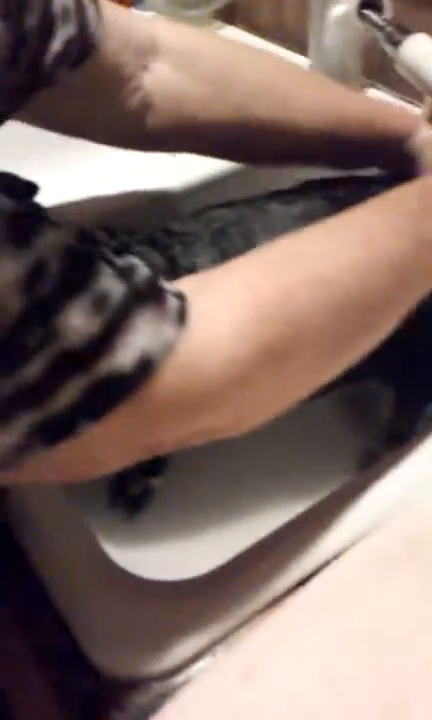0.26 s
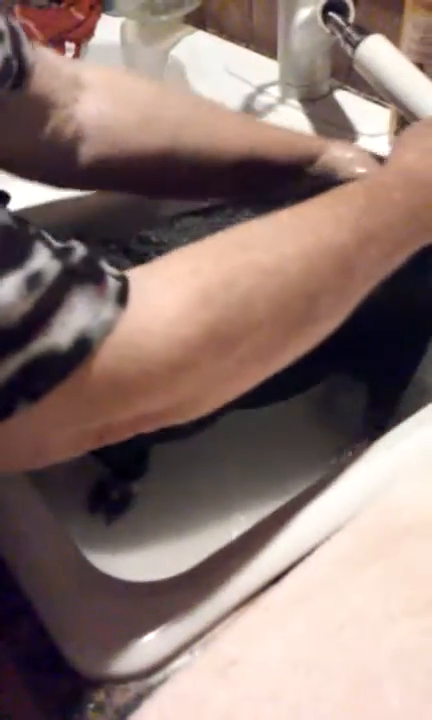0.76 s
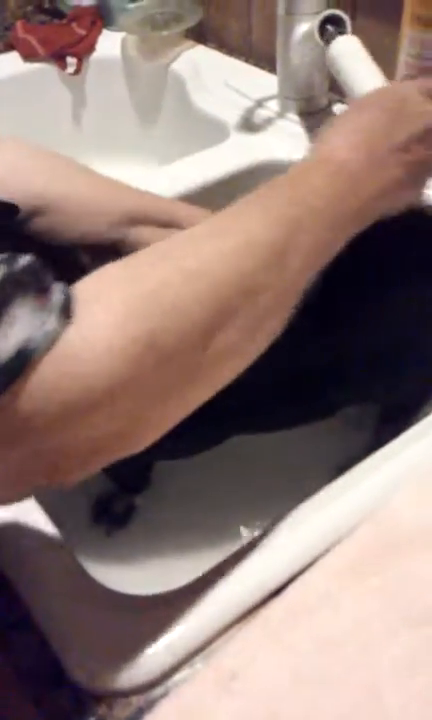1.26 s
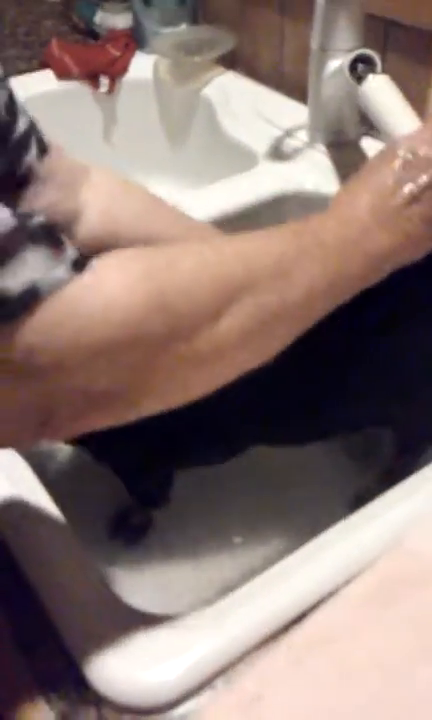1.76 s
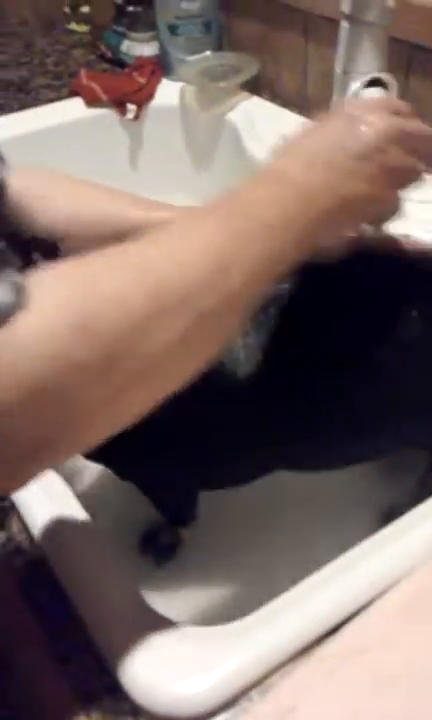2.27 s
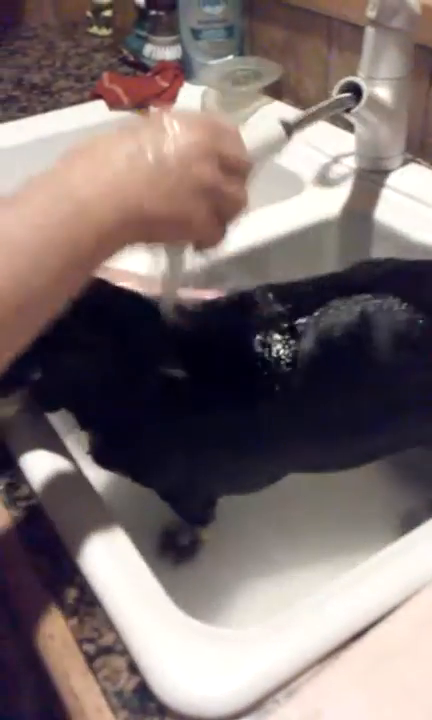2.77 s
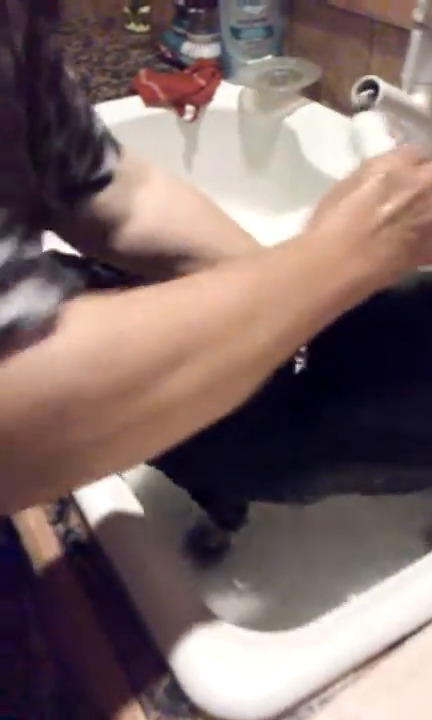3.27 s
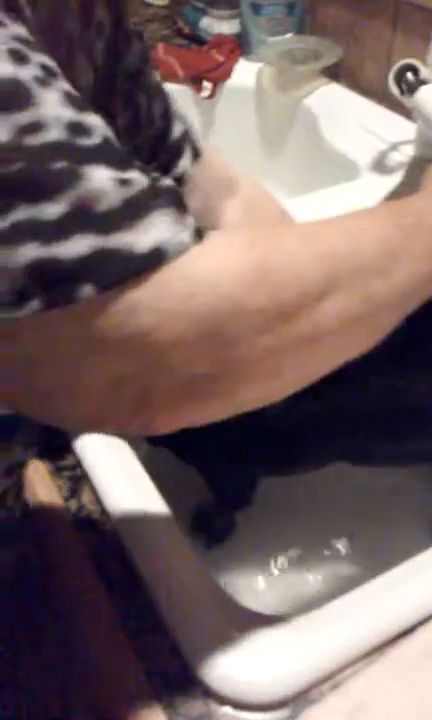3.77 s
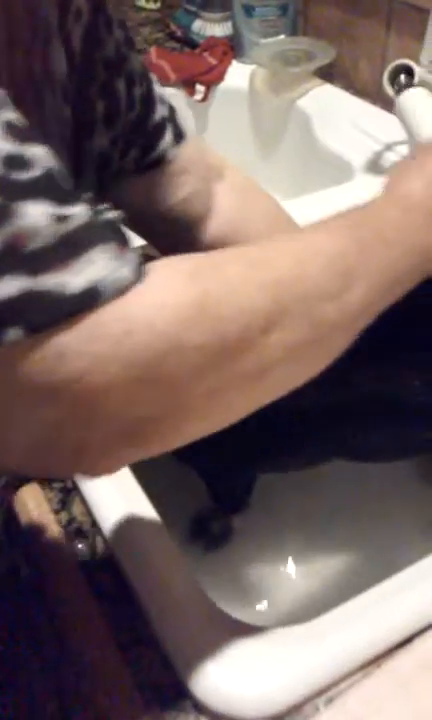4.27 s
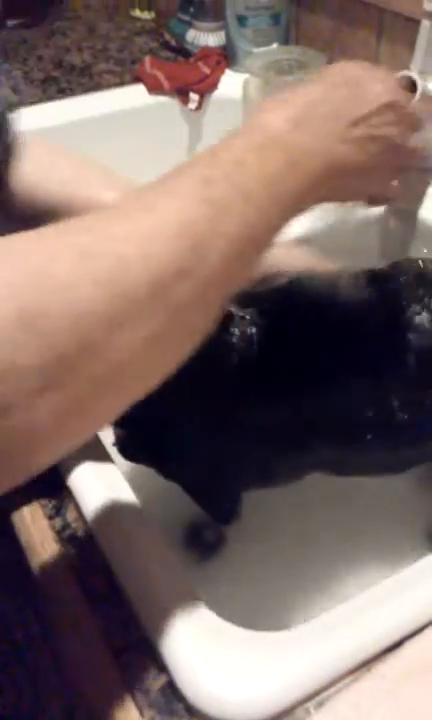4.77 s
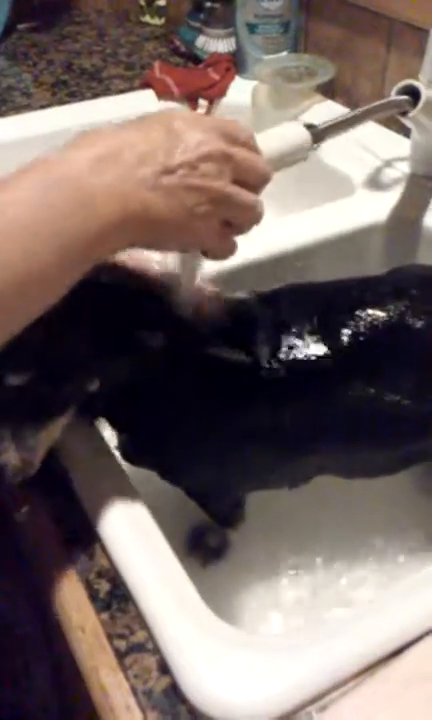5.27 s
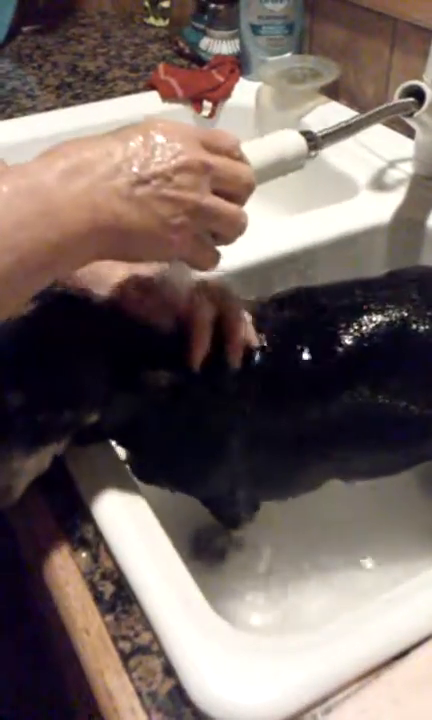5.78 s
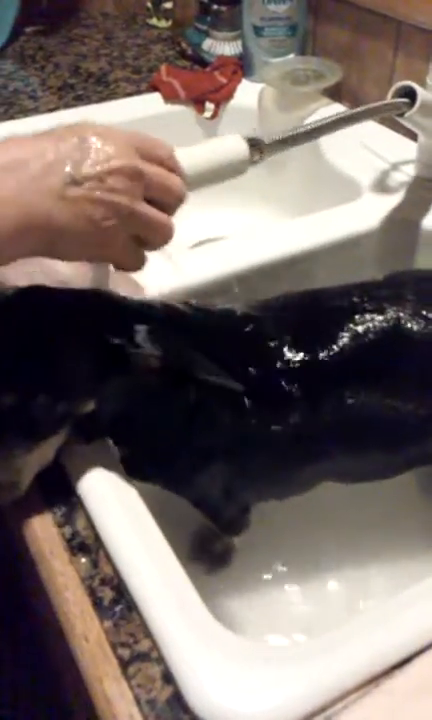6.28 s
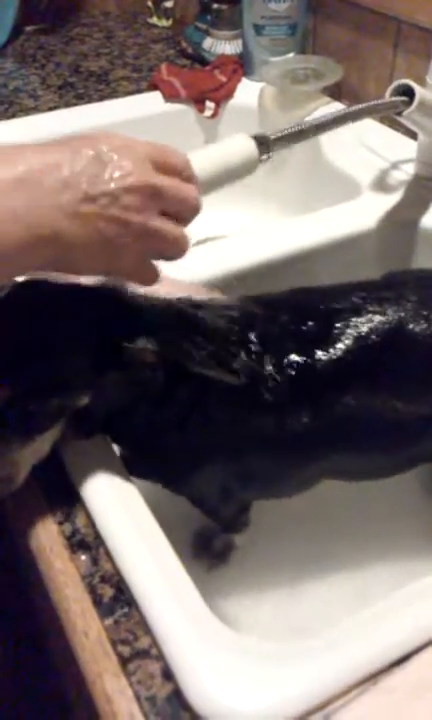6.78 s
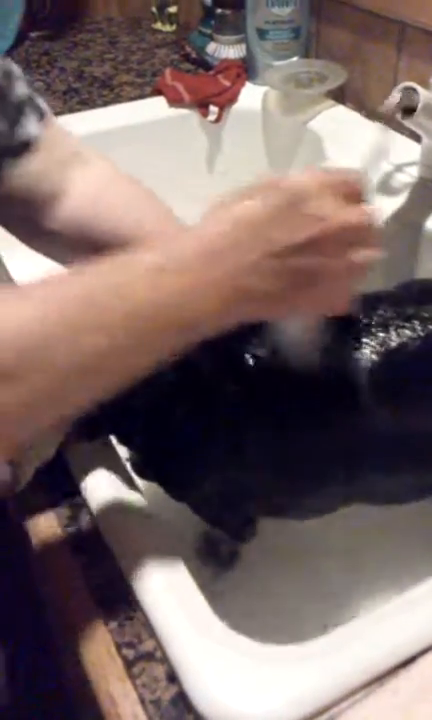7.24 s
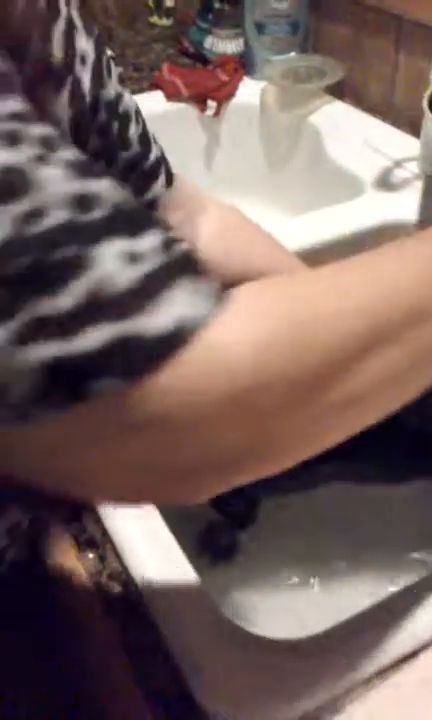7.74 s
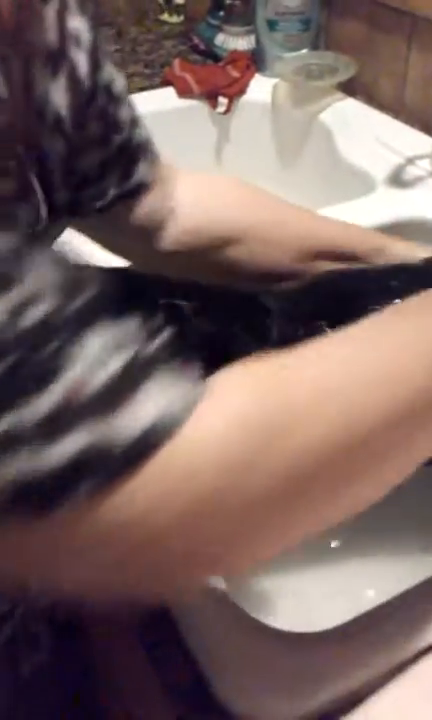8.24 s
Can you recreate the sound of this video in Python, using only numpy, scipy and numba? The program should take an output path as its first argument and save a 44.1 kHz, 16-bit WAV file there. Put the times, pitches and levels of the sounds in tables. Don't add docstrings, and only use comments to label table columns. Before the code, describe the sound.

A close phone microphone picks up a sink sprayer rinsing a small wet dog. Bright hiss and mid-pitched run-off patter come in ragged bursts, with plops, high pings, sharp droplet cracks and occasional low glugs. Noise suppression keeps chopping the water to near silence, leaving tiny ticks before it snaps open again. A faint fridge hum rides under the louder spurts.

```python
import sys
import numpy as np
from scipy import signal
from scipy.io import wavfile
from scipy.ndimage import uniform_filter1d
from numba import njit

SR = 44100
rng = np.random.default_rng(int(sys.argv[2]) if len(sys.argv) > 2 else 0)


def voltage_ratio(decibels):
    exponent = np.asarray(decibels, float) / 20
    return 10 ** exponent


def digitize_waveform(pressure):
    field = np.atleast_2d(pressure).T
    bounded = np.clip(field, -1, 1)
    quanta = np.round(bounded * 32767).astype(np.int16)
    wavfile.write(sys.argv[1], SR, quanta)


N = 375291
TOP_HZ = 15780

# (frequency [Hz], density [dB per Hz])
JET_SPECTRUM = [(1760, -30), (3000, -11.5), (3620, -0.5), (3940, -8.5), (4470, 3.5), (5000, -7), (6220, -1),
                (11500, -1.5), (16000, -4)]
# (time [s], treble slope of the hiss [dB per octave])
FACING = [(0, -4), (.5, -4), (.9, -2.5), (1.6, 0), (2.1, -3), (2.6, 2), (3.101, -1.5), (3.601, 0),
          (4.2, -2), (4.6, 2), (5.101, 4.5), (5.402, 4), (5.799, 0), (6.351, -2), (6.8, -0.5), (7.2, 0.5),
          (7.601, -1.5), (8.5, -1)]


def jet(hiss_db, openness):
    slope = openness * np.interp(np.arange(N) / SR, *np.transpose(FACING))
    fizz = swarm(rate=1400, centre_hz=5000, octaves=0.7, cycles=16.0, spread_db=3.6, glide=0.03)
    crackle = swarm(rate=160, centre_hz=6000, octaves=0.5, cycles=6.0, spread_db=2.8, glide=0)
    hiss = patchy(JET_SPECTRUM, openness, per_octave=6, snap_db=2.0, fall_s=0.07, flicker_db=3.5, tilt_db=slope)
    return voltage_ratio(hiss_db - 0.1) * (hiss + openness * voltage_ratio(-6.0) * (fizz + crackle))


# (frequency [Hz], density [dB per Hz])
PATTER_SPECTRUM = [(150, -32), (250, -15), (599, -18), (690, -17.5), (786, -16.5), (916, -24.5),
                   (1080, -4.5), (1340, -13.5), (2090, -1), (2650, -11.5), (4200, -27), (5460, -36),
                   (9240, -120)]


def run_off(patter_db, openness):
    small_bubbles = swarm(rate=300, centre_hz=2050, octaves=0.3, cycles=13.0, spread_db=4.3, glide=0.03)
    patter = patchy(PATTER_SPECTRUM, openness, per_octave=7, snap_db=3.4, fall_s=0.045, flicker_db=3.0)
    return voltage_ratio(patter_db - 14.5) * (patter + openness * small_bubbles)


# (frequency [Hz], width [Hz])
BASIN_DIPS = [(800, 89), (1400, 110), (2800, 52), (4000, 330), (5800, 370)]


def basin(water):
    for hz, width in BASIN_DIPS:
        water = water - 0.62 * svf(water, float(hz), float(width))
    return water


# (crest time [s], peak level
# [dB], frequency [Hz], swell time [ms])
POOL_DROPS = [(0.031, -40, 1850, 3.9), (0.169, -32.5, 1740, 5.3), (0.766, -30, 1730, 2), (0.816, -26, 1735, 3),
              (0.827, -30.5, 1800, 3), (0.911, -32, 1780, 1.07), (0.915, -31.5, 1563, 3.5),
              (1.102, -40.5, 1670, 1.7), (1.984, -37, 1715, 4.5), (2.367, -25, 1867, 2), (2.373, -30.5, 1880, 2),
              (2.905, -30.0, 1950, 3), (3.102, -36.0, 1738, 7), (3.183, -28.5, 1960, 3.4),
              (3.51, -38.5, 1780, 5.6), (3.587, -31, 1930, 0.9), (3.68, -27.5, 1484, 6.5),
              (3.698, -22.5, 1680, 4), (3.752, -25.5, 1790, 3), (3.793, -27, 1850, 2), (3.798, -30.5, 1680, 2.6),
              (3.826, -30, 1940, 2.9), (3.869, -25.5, 1383, 4.1), (3.879, -33, 1920, 3.1),
              (4.296, -22.5, 1685, 0.9), (4.301, -31, 1890, 2), (4.565, -41, 1640, 7.9), (5.132, -40, 1950, 6.5),
              (5.154, -40.5, 1970, 6.5), (5.814, -28.5, 1780, 5.6), (5.872, -20.5, 1780, 4.9),
              (5.884, -29, 1970, 1.3), (6.335, -34, 2016, 6.5), (7.454, -27, 1880, 1.17), (8.03, -38, 1710, 4),
              (8.081, -31.5, 1745, 6.1), (8.462, -29.5, 1560, 3.2),
              (0.068, -34, 1970, 2.8), (0.151, -29.5, 2300, 2), (1.887, -24, 2400, 2.8),
          (1.903, -30, 2100, 2.5), (1.922, -29.5, 2110, 3), (2.11, -28.0, 2240, 2), (2.296, -37, 2100, 2),
          (2.618, -46, 2170, 6.2), (2.916, -27, 2210, 2.4), (2.927, -27.5, 2200, 3.3),
          (3.002, -31.0, 2400, 1.1), (3.204, -30, 2100, 3.7), (4.262, -30, 2060, 2),
          (4.279, -24.5, 1960, 0.62), (4.296, -29, 2240, 1.3), (4.666, -33.5, 1950, 6.5),
          (4.682, -26.5, 2240, 2), (4.766, -27.5, 2230, 1.7), (4.929, -31.5, 2160, 2.8),
          (4.959, -33.5, 2260, 2.8), (5.012, -30.5, 2350, 2), (5.177, -36.0, 2130, 4.2),
          (5.283, -32, 2170, 2), (5.828, -27.5, 1970, 3.8), (5.9, -32, 2050, 6.5), (6.317, -33, 2020, 3.1),
          (6.326, -25.5, 2120, 1.3), (6.344, -27, 2170, 2.16), (6.406, -31.5, 2000, 2),
          (6.507, -30.0, 2610, 1.7), (7.366, -29, 2160, 0.95), (7.376, -31, 2340, 5.1),
          (7.396, -35.5, 2405, 7.1), (7.417, -32.0, 2340, 3.1), (7.6, -38.5, 2070, 5.3),
          (8.179, -34, 2510, 4.5), (8.192, -30, 2480, 3.2), (8.381, -32, 2000, 4.1), (8.397, -31, 2050, 2),
          (8.412, -23.5, 2030, 6.5)]


def pool_drops(gate_db):
    return drops(POOL_DROPS, gate_db, ring_db=0.96, leak_db=-11.5, width=0.57, leak_t60=0.16, glide=0.023)


# (crest time [s], peak level [dB], frequency [Hz], swell time [ms])
PINGS = [(0.01, -32, 5400, 0.8), (0.067, -38, 4650, 1.7), (0.125, -38, 3900, 3), (0.21, -34, 5080, 2),
         (0.212, -26.5, 3570, 2.8), (0.368, -22.5, 4840, 1.9), (0.371, -29.0, 3960, 1.03),
         (0.452, -31, 5020, 2), (0.499, -30, 3700, 0.88), (0.603, -22.5, 4780, 0.8),
         (0.604, -35.5, 2840, 4.8), (0.818, -26.0, 3440, 1.8), (0.818, -23, 4850, 1.28),
         (1.886, -34.5, 4625, 1.8), (1.891, -24, 2900, 1), (2.08, -38.5, 4630, 2.3),
         (2.899, -25.5, 5100, 0.8), (2.902, -31.0, 4570, 1.3), (2.926, -34, 4620, 3.6),
         (3.116, -25, 4650, 4.1), (3.134, -28, 3490, 0.53), (3.231, -29.5, 4870, 1.3),
         (4.669, -24, 4960, 0.8), (5.744, -28, 3950, 1.6), (5.757, -25.5, 4330, 1.9),
         (5.934, -38, 4250, 2.2), (6.42, -37.0, 5030, 4.2), (6.488, -30, 4280, 1.3),
         (6.505, -40.5, 3100, 8.1), (6.519, -33.5, 3080, 2.9), (6.832, -36.5, 4320, 1.4),
         (8.028, -33, 5750, 1.46), (8.138, -39, 3130, 2), (8.143, -25, 4930, 0.8),
         (8.178, -30.5, 3270, 1.8), (8.202, -27.5, 4560, 0.8), (8.202, -23.5, 3200, 1.14),
         (8.207, -32, 3230, 1.3), (8.303, -25.5, 4600, 2)]


def wall_drops(gate_db):
    return drops(PINGS, gate_db, ring_db=0.74, leak_db=-10.5, width=0.28, leak_t60=0.11, glide=0.015)


# (crest time [s], peak level [dB], frequency [Hz], swell time [ms])
GLUGS = [(.068, -36.5, 1110, 3), (.699, -29, 1232, 6), (.82, -24.5, 752, 8), (.832, -27, 1115, 9),
         (.968, -41, 241, 9), (2.089, -34, 1047, 7.5), (2.154, -39, 1070, 3), (2.35, -24, 234, 4.5),
         (2.373, -37.5, 243, 9), (3.077, -28, 846, 12), (3.099, -30, 874, 4.5), (3.232, -22, 749, 4.5),
         (3.257, -30.5, 713, 6.5), (3.489, -36, 1034, 4.5), (3.706, -29, 1030, 11), (3.713, -22.5, 357, 9),
         (3.751, -29.5, 510, 6.5), (4.278, -38, 494, 6.5), (4.279, -36, 718, 8), (4.667, -34.5, 476, 3),
         (4.673, -20.5, 399, 3), (5.058, -33.5, 1160, 6.5), (5.266, -39, 1425, 5.05),
         (5.777, -34, 1146, 6.5), (5.814, -22.5, 747, 3), (5.823, -32.5, 830, 6.5),
         (5.841, -35.5, 760, 4.5), (5.954, -37.5, 216, 17), (5.99, -39.5, 190, 9), (6.44, -37, 1530, 5.05),
         (6.527, -30, 526, 9), (6.56, -33, 538, 12), (6.592, -37.5, 535, 9), (6.67, -47, 824, 9),
         (8.1, -27, 204, 6), (8.145, -30.5, 820, 4.5), (8.154, -29, 1110, 3), (8.179, -31, 1190, 4.5),
         (8.446, -32, 1180, 3)]


def gulps(gate_db):
    return drops(GLUGS, gate_db, ring_db=0.37, leak_db=-11, width=0.28, leak_t60=0.26, glide=0.017)


# (time [s], peak level [dB],
# frequency [Hz], 8 dB fall time of the # ring [ms])
SINGING_BANDS = [(.322, -39, 740, 3.5), (1.609, -29.5, 1800, 2), (1.612, -38, 2300, 13), (2.633, -41, 437, 25),
                 (5.09, -41.5, 1976, 133), (5.123, -46, 448, 35), (5.235, -51, 423, 13),
                 (7.275, -41.5, 2236, 68), (8.34, -40.5, 2050, 60), (4.886, -44.5, 3190, 147),
                 (6.268, -40, 2000, 137), (7.345, -40, 2090, 42), (3.462, -46.5, 1056, 72.5),
                 (7.8, -51.5, 702, 57), (8.34, -49.5, 639, 113), (.006, -46, 4700, 54), (.006, -44, 3020, 23),
                 (.2, -37, 1185, 12), (.33, -41, 2120, 36), (.38, -44, 4820, 95), (.77, -50, 1070, 33),
                 (.85, -41, 1466, 63), (2.61, -42, 2344, 61), (3.24, -37, 1078, 47), (3.565, -44.5, 2730, 62),
                 (3.85, -45.5, 3050, 97), (4.252, -29, 2130, 2.5), (4.345, -47, 4470, 60),
                 (5.727, -38, 4450, 15), (5.735, -40.5, 1640, 58), (6.265, -43, 4580, 80.5),
                 (6.29, -43, 1454, 60), (6.39, -50, 4900, 87), (6.6, -46.5, 3400, 12), (7.41, -50, 1320, 39),
                 (7.42, -46, 4270, 46), (7.56, -47.5, 2040, 74), (7.82, -51, 1344, 31), (7.83, -46.5, 2020, 50),
                 (7.915, -48.5, 1984, 50), (8.06, -44.5, 5060, 68), (8.17, -38, 1680, 42)]


def singing_bands(gate_db):
    return bubbles(SINGING_BANDS, gate_db, ring_db=-6.0, leak_db=-7, width=0.12, leak_t60=0.027, glide=0, rise_s=0.006)


# (time [s], peak level [dB], frequency [Hz], 8 dB fall time of the ring [ms])
BLOOPS = [(.121, -49.5, 713, 42), (.284, -54, 740, 28), (1.291, -46, 687, 7), (2.39, -43.5, 990, 13),
          (2.717, -43, 444, 32), (4.67, -37.5, 1102, 10.5), (4.976, -45, 925, 14),
          (5.117, -45.5, 1131, 33.5), (6.838, -50, 1143, 40), (7.925, -53, 709, 71), (7.935, -45, 158, 42),
          (8.356, -44, 162, 72)]


def gurgles(gate_db):
    return bubbles(BLOOPS, gate_db, ring_db=4.5, leak_db=-12.0, width=0.23, leak_t60=0.035,
                   glide=0.0077, rise_s=0.003)


# (time [s], peak level [dB])
CRACKS = [(0.0274, -36), (0.21, -35.5), (0.367, -34), (0.432, -39), (0.601, -48), (0.6738, -40),
          (3.565, -38), (3.93, -40.5), (4.295, -44), (0.8151, -25.5), (1.8771, -62), (1.886, -34.5),
          (2.8783, -34.5), (2.896, -30.5), (3.221, -39), (4.6666, -37.5), (5.575, -63), (5.591, -51),
          (5.726, -42.5), (5.7528, -37), (6.265, -57.5), (6.516, -35), (8.135, -32)]


def cracks(gate_db):
    table = [(*row, 9000, 1) for row in CRACKS]
    return bubbles(table, gate_db, ring_db=-9.5, leak_db=6.5, width=11.0, leak_t60=0.004, glide=0, rise_s=0.0013)


# (time [s], peak level [dB], frequency [Hz])
SPARKS = [(0.009, -45.5, 10800), (0.028, -38.5, 8600), (0.053, -46, 6540), (0.053, -43.5, 7710),
          (0.384, -43.5, 8800), (0.431, -40, 8300), (0.674, -38.5, 11000), (0.816, -33, 8500),
          (0.848, -43, 10250), (1.889, -39, 13300), (1.918, -44, 13300), (2.878, -43, 9700),
          (2.899, -35.5, 11300), (3.221, -43, 14560), (3.716, -47.5, 12400), (4.343, -45, 11900),
          (4.666, -40.5, 12100), (4.999, -45, 11580), (5.057, -45, 6720), (5.1, -44.5, 6490),
          (5.751, -38.5, 7900), (5.814, -48, 9700), (6.412, -41.5, 8570), (7.75, -46, 6000),
          (8.137, -41, 13300), (8.411, -38, 7600), (8.433, -36, 13800), (8.453, -43, 7560),
          (8.468, -41, 8010), (8.499, -42, 7380)]


def spatter(gate_db):
    table = [(*row, 1.1) for row in SPARKS]
    return bubbles(table, gate_db, ring_db=2.5, leak_db=8.5, width=0.29, leak_t60=0.0018, glide=0.03, rise_s=0.0018)


# (time [s], peak level [dB])
TICKS = [
    (1.8213, -58),
    (5.53, -58),
    (2.2, -40),
    (6.94, -57.5),
    (6.9915, -62),
    (7.037, -63),
    (7.095, -67),
    (7.1424, -67),
]


def drips():
    table = [(*row, 2200, 2) for row in TICKS]
    return bubbles(table, np.zeros(N), ring_db=2.0, leak_db=-11.0, width=1.0, leak_t60=0.018, glide=0, rise_s=0.0026)


# (frequency [Hz], level [dB])
HUM = [
    (59.3, 4),
    (120.0, -3.5),
]
# (frequency [Hz], density [dB per Hz])
RUMBLE_SPECTRUM = [(15, -38.5), (25, 1.5), (65, -7), (107, -8), (167, 2.5), (275, -21), (350, -9.5),
                   (460, -34), (770, -120)]


def fridge(hum_db):
    t = np.arange(N) / SR
    lines = sum(voltage_ratio(db + 0.61 * walk(6.3)) * np.sin(2 * np.pi * hz * t) for hz, db in HUM)
    rumble = voltage_ratio(4.5) * patchy(RUMBLE_SPECTRUM, 1.0, per_octave=3, snap_db=3.0, fall_s=0.077, flicker_db=4.0)
    offset = 0.16 * uniform_filter1d(voltage_ratio(hum_db), SR // 20) + voltage_ratio(-76.5)
    low_cut = signal.butter(2, 48, "high", fs=SR, output="sos")
    return signal.sosfilt(low_cut, voltage_ratio(hum_db) * (lines + rumble)) - offset


def self_noise():
    return level(svf(rng.standard_normal(N), 400.0, 1500.0), -86.0)


# (opening time [s], hiss level [dB], held time [s], final hiss level [dB])
SPURTS = [(0.0, -42, 0.35, -45.5), (0.371, -46, 0.19, -42), (0.596, -44, 0.37, -52),
          (0.818, -40, 0.17, -51.5), (1.87, -47.5, 0.19, -56), (2.08, -56, 0.083, -54.5),
          (2.297, -50.5, 0.29, -53.5), (2.608, -51.5, 0.28, -48.5), (2.899, -42.5, 0.32, -43),
          (3.231, -43.5, .19, -57), (3.462, -51, 0.46, -47), (3.942, -50, 0.072, -60),
          (4.05, -79, 0.061, -82), (4.255, -57, 0.13, -47), (4.474, -60.5, 0.091, -71.5),
          (4.558, -48.5, 0.078, -69.5), (4.64, -46, 0.24, -56), (4.888, -46.5, 0.44, -53.5),
          (5.73, -56.5, 0.092, -42.5), (5.824, -47.5, .19, -54.5), (6.267, -48, 0.3, -46),
          (6.591, -49.5, 0.047, -67.5), (6.734, -75, 0.04, -68.5), (7.256, -66.5, 0.02, -52.5),
          (7.279, -50.5, 0.12, -42.5), (7.377, -41.5, 0.51, -53), (7.918, -53.5, 0.066, -50),
          (8.011, -54.5, 0.18, -41.5), (8.193, -40.5, 0.094, -49), (8.278, -47.5, 0.22, -36.5)]
# (opening time [s], hiss level [dB], held time [s])
BLINKS = [(1.1, -57.5, 0.0062), (1.138, -58, 0.007), (1.293, -56.5, 0.001), (1.029, -60.5, 0.011),
          (1.608, -58.5, .041), (2.199, -69.5, 0.0087), (4.13, -58, 0.018), (4.176, -58.5, 0.0016),
          (5.398, -61, .036), (5.577, -59, 0.02), (6.656, -61.5, .076), (6.826, -52, 0.02),
          (6.943, -71.5, 0.0036), (6.993, -68, .006), (7.037, -77, 0.004), (7.093, -71, 0.013),
          (7.143, -72, .012), (7.18, -76, .004), (7.201, -55.5, 0.017)]


def gate():
    open_db_per_s, shut_db_per_s, shut_db = 4200, 700, -81
    t = np.arange(0, N + 16, 16) / SR
    widest = np.full(len(t), -200.0)
    for opens, db, held, end_db in SPURTS + [(*row, row[1]) for row in BLINKS]:
        shuts = opens + held
        edges = open_db_per_s * np.maximum(opens - t, 0) + shut_db_per_s * np.maximum(t - shuts, 0)
        widest = np.maximum(widest, np.interp(t, [opens, shuts], [db, end_db]) - edges)
    power = voltage_ratio(2 * shut_db) + voltage_ratio(2 * widest)
    return np.interp(np.arange(N) / SR, t, 10 * np.log10(power))


# (hiss level [dB], patter minus hiss [dB],
# hum minus hiss [dB])
BALANCE_LAW = [
    (-72.5, 9, -8.5),
    (-61.5, 12, -3.5),
    (-42.5, 7.5, -15.5),
]
# (time [s], extra run-off [dB], extra hum [dB])
DRIFT = [(0, 4.5, -3), (.55, -1.5, -3.5), (1.0, 3.5, 0.5), (1.9, 4, 0.5), (2.5, 7, 6), (3.0, 0, 0.5),
         (3.5, 3.5, 3), (3.9, 6, -5), (4.121, 1.5, 5.5), (4.3, 5.5, -3.5), (4.9, 0, -1), (5.3, 6, 3),
         (5.8, 6.5, -1), (6.3, 1.5, 3.5), (7.001, 2.5, 5.5), (7.4, 1, 0), (7.9, -2, 5), (8.5, 2.5, 6.5)]


def balance(hiss_db):
    t = np.arange(N) / SR
    law_hiss, law_patter, law_hum = np.transpose(BALANCE_LAW)
    drift_s, drift_patter, drift_hum = np.transpose(DRIFT)
    patter_db = hiss_db + np.interp(hiss_db, law_hiss, law_patter) + np.interp(t, drift_s, drift_patter)
    hum_db = hiss_db + np.interp(hiss_db, law_hiss, law_hum) + np.interp(t, drift_s, drift_hum)
    return patter_db, hum_db


def closing(gate_db, start, crest, count):
    reference = gate_db[min(crest + SR // 100, N - 1)]
    return np.minimum(gate_db[start:start + count] - reference, 0)


def drops(table, gate_db, ring_db, leak_db, width, leak_t60, glide):
    out, t = np.zeros(N), np.arange(SR // 4) / SR
    for s, db, hz, swell_ms in table:
        swell_s = swell_ms / 1000
        u = 1000 * t / max(swell_ms, 0.5)
        start = max(int((s - swell_s) * SR), 0)
        bent_t = t + glide * swell_s * (np.minimum(u, 4) - 1) ** 2 / 2
        ring = np.sin(2 * np.pi * hz * bent_t) * (u * np.exp(1 - u)) ** 2
        spray = level(noise_band(len(t), hz, width * hz), leak_db)
        leak = spray * np.minimum(u / 2, 1) ** 2 * 1000.0 ** (-t / leak_t60)
        shut = closing(gate_db, start, int(s * SR), len(t))
        out[start:start + len(t)] += voltage_ratio(db + shut) * (voltage_ratio(ring_db) * ring + leak)[:N - start]
    return out


def bubbles(table, gate_db, ring_db, leak_db, width, leak_t60, glide, rise_s):
    out, t = np.zeros(N), np.arange(SR // 4) / SR
    for s, db, hz, fall_ms in table:
        start = max(int((s - rise_s / 2) * SR), 0)
        t60 = max(0.0072 * fall_ms, 6.7 / hz)
        bent_t = t * (1 + glide * np.minimum(t / t60, 1))
        ring = np.sin(2 * np.pi * hz * bent_t) * 1000.0 ** (-t / t60)
        noise = level(noise_band(len(t), hz, width * hz), leak_db)
        leak = noise * 1000.0 ** (-t / (leak_t60 + 4.45 * t60))
        rise = np.sin(np.pi / 2 * np.minimum(t / max(rise_s, 1.39 / hz), 1)) ** 2
        sound = ((voltage_ratio(ring_db) * ring + leak) * rise)[:N - start]
        out[start:start + len(t)] += voltage_ratio(db + closing(gate_db, start, start, len(t))) * sound
    return out


def swarm(rate, centre_hz, octaves, cycles, spread_db, glide):
    when, ring, loudness = rng.random((int(rate * N / SR), 3)).T
    hz = np.clip(centre_hz * 2 ** (octaves * rng.standard_normal(len(when))), 300, TOP_HZ)
    size = voltage_ratio(np.minimum(-spread_db * np.log(1 - loudness), 12))
    return level(grains((when * N).astype(np.int64), hz, cycles * (0.5 + ring), size, glide), 0)


@njit
def grains(start, hz, cycles, size, glide):
    out = np.zeros(N)
    for k in range(len(start)):
        count = int(3 * cycles[k] * SR / hz[k])
        phase, step = 0.0, 2 * np.pi * hz[k] / SR
        for i in range(min(count, N - start[k])):
            u = i / count
            phase += step * (1 + glide * u)
            out[start[k] + i] += size[k] * min(5 * u, 1.0) * np.exp(-6 * u) * np.sin(phase)
    return out


def patchy(spectrum, openness, per_octave, snap_db, fall_s, flicker_db, tilt_db=0):
    hz, db = np.transpose(spectrum)
    out, shared = 0, flicker_db * walk(55)
    span = np.log2(hz[hz < 17000][-1] / hz[1])
    for f in hz[1] * 2 ** np.arange(0, span, 1 / per_octave):
        width = 1.5 * f * np.log(2) / per_octave / np.cos(np.pi * f / SR)
        band = level(noise_band(N, f, width), 10 * np.log10(f))
        wander = openness * (snap_db * np.minimum(snaps(8.2, fall_s), 2) + shared)
        tilt = tilt_db * max(np.log2(f / 5200), 0)
        out = out + voltage_ratio(np.interp(np.log(f), np.log(hz), db) + wander + tilt) * band
    return level(out, 0)


def snaps(rate, fall_s):
    steps = N // 32 + 1
    kicks = (rng.random(steps) < 32 * rate / SR) * rng.exponential(1, steps)
    sag = np.sqrt(signal.lfilter([1], [1, -np.exp(-32 / (fall_s * SR))], kicks))
    sag = uniform_filter1d(sag, size=6)
    return np.repeat((sag - sag.mean()) / sag.std(), 32)[:N]


def walk(rate):
    hold = int(SR / rate)
    steps = np.repeat(rng.standard_normal(N // hold + 1), hold)
    return 1.3 * uniform_filter1d(uniform_filter1d(steps, hold), hold)[:N]


def noise_band(count, hz, width):
    return svf(svf(rng.standard_normal(count), float(hz), float(width)), float(hz), float(width))


@njit
def svf(x, hz, width):
    y, band, low = np.empty(len(x)), 0.0, 0.0
    g, k = np.tan(np.pi * hz / SR), width / hz
    for i in range(len(x)):
        v = (band + g * (x[i] - low)) / (1 + g * (g + k))
        band, low, y[i] = 2 * v - band, low + 2 * g * v, k * v
    return y


def level(x, db):
    return x * voltage_ratio(db) / np.sqrt(np.mean(x ** 2))


def scene():
    hiss_db = gate()
    patter_db, hum_db = balance(hiss_db)
    openness = np.clip((hiss_db + 80) / 20, 0, 1)
    water = basin(jet(hiss_db, openness) + run_off(patter_db, openness))
    for source in (pool_drops, wall_drops, gulps, singing_bands, gurgles, cracks, spatter):
        water = water + source(hiss_db)
    return (water + drips() + fridge(hum_db) + self_noise())[None]


def band_limit(x):
    return signal.sosfilt(signal.butter(12, 16500, fs=SR, output="sos"), x)


def record(dry):
    top_cut = signal.ellip(12, 0.2, 70, TOP_HZ, fs=SR, output="sos")
    mix = signal.sosfilt(top_cut, dry)
    return band_limit(mix)


dry = scene()
out = record(dry)
digitize_waveform(out)
```